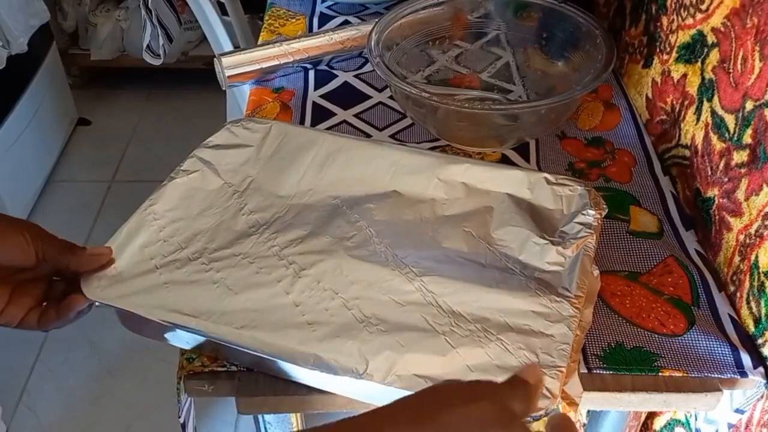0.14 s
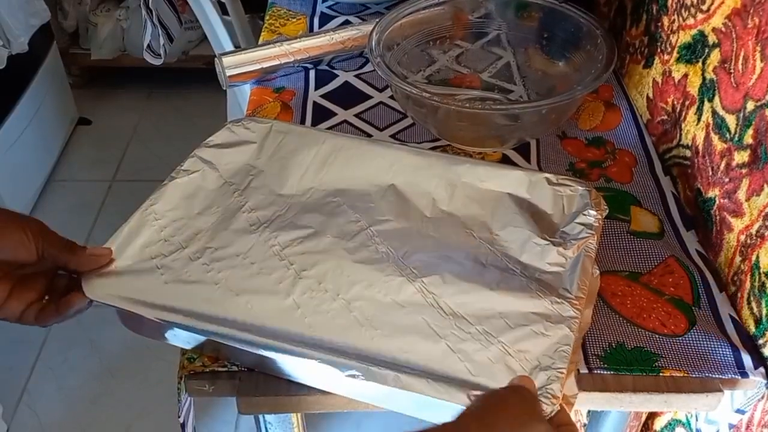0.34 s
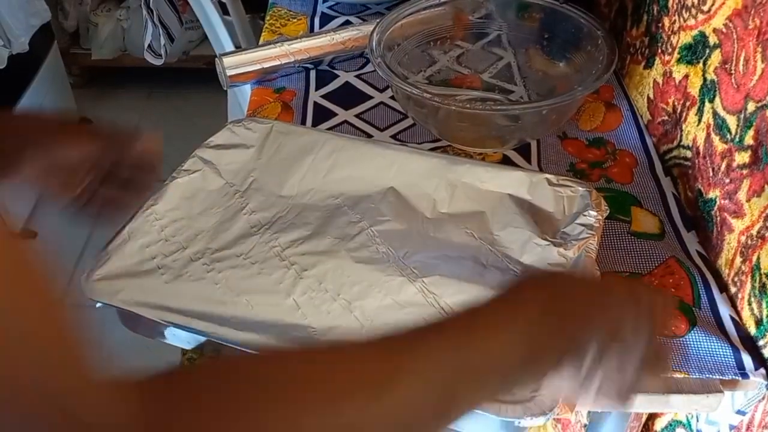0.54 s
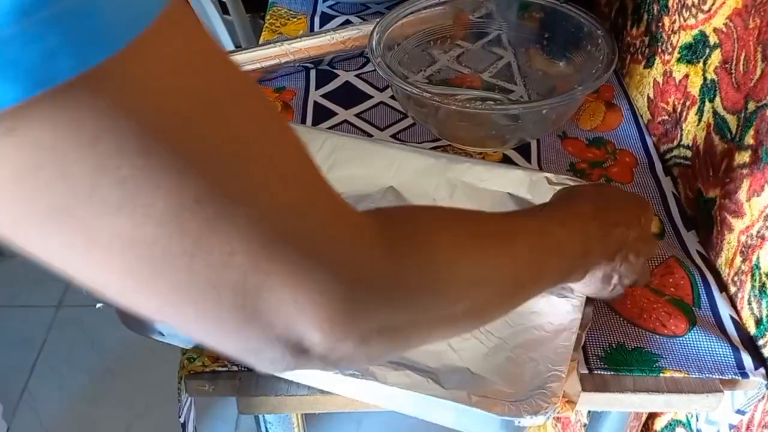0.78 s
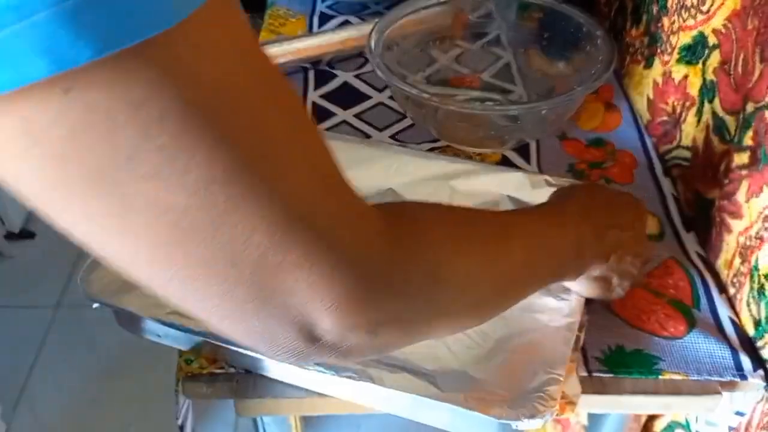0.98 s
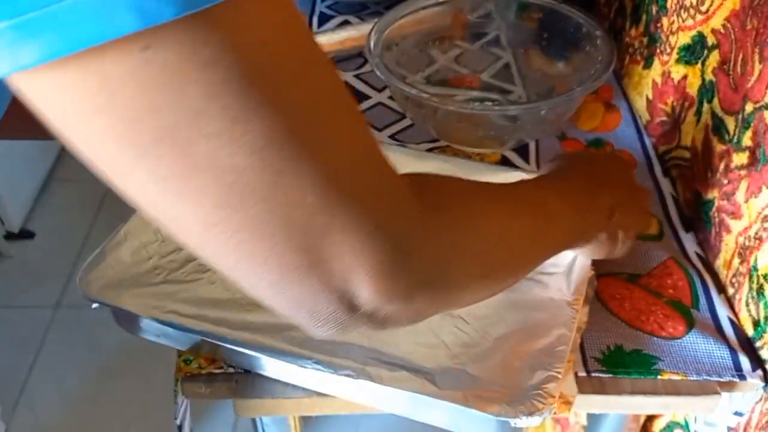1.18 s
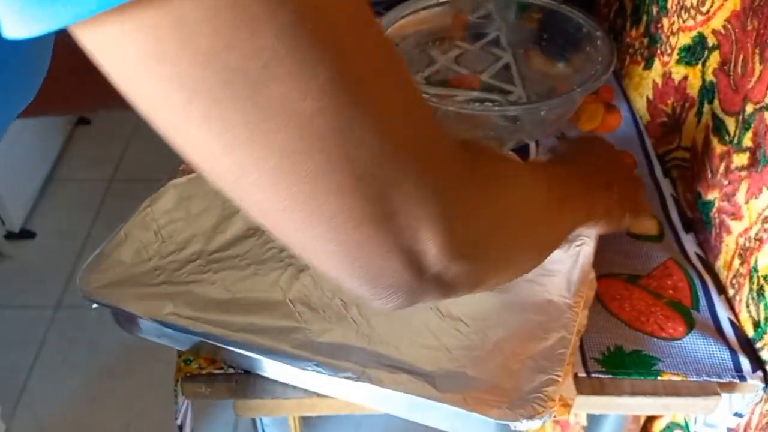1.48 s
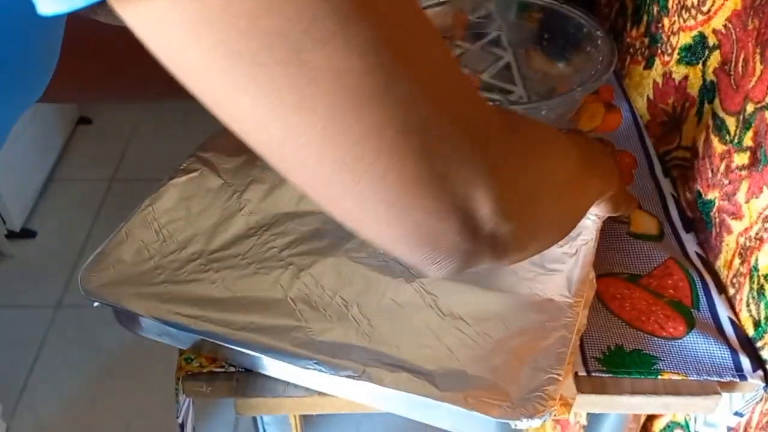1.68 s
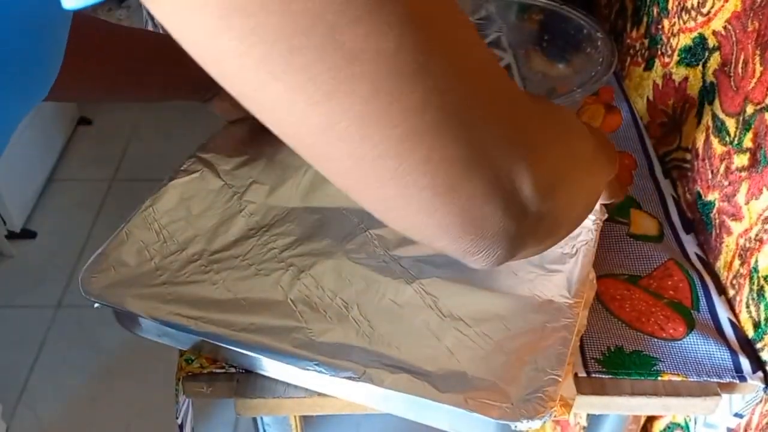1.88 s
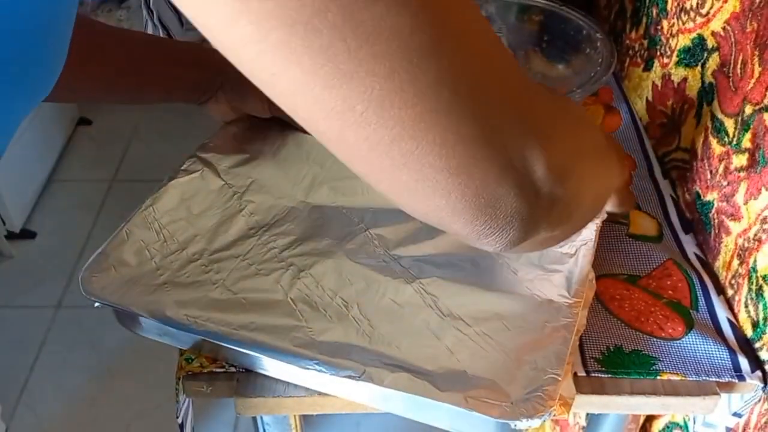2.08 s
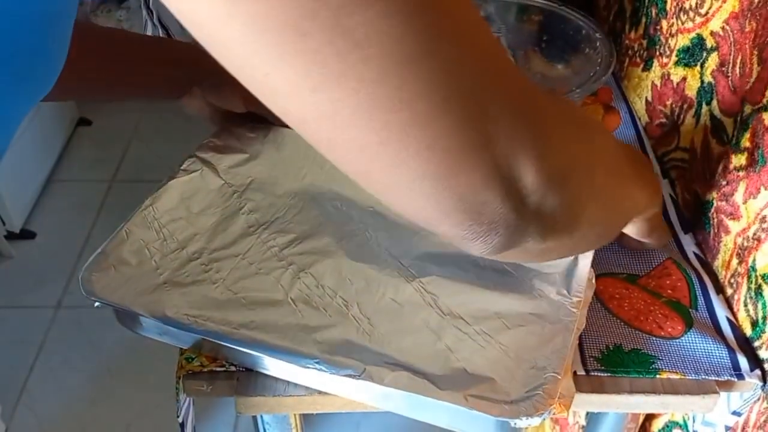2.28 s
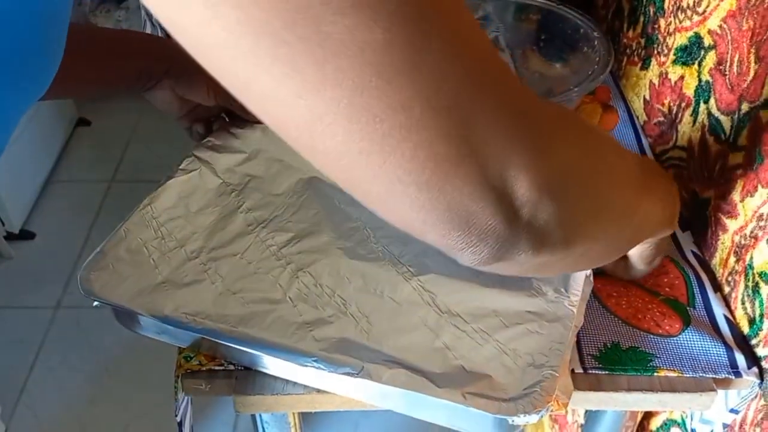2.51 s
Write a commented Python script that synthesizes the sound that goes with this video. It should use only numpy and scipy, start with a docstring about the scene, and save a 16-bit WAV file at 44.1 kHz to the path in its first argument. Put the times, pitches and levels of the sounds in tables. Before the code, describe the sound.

Aluminium foil crackles close by, brightest on the right: a soft boom and a strong tug knocking the tray, a brief lull, then uneven crimping with sharp creases and small pops in a quiet small kitchen.

```python
"""Hands pull a sheet of aluminium foil over a baking tray and crimp it round the rim, in a small kitchen.
The pull opens with a soft falling boom; then two tugs knock the tray and the crackle swells close on the right.
The hands crimp a corner, then an edge, where wide panels of foil pop. Louder cracks of single creases run through it all.
The foil buckles in thousands of tiny random snaps a second: shaped noise makes each one ring in facets, sheet and tray.
Booms, knocks and pops are dying sines; a quiet room noise lies beneath."""
import sys
import numpy as np
from scipy import signal
from scipy.fft import rfft, irfft
from scipy.io import wavfile
from scipy.ndimage import uniform_filter1d

SR = 44100
rng = np.random.default_rng(int(sys.argv[2]) if len(sys.argv) > 2 else 0)


def master_out(mix):
    """Clip the mix to full scale and print it as 16-bit PCM to the path in sys.argv[1]."""
    frames = np.transpose(np.atleast_2d(mix))
    ceiling = np.clip(frames, -1, 1)
    pcm = np.round(ceiling * 32767).astype(np.int16)
    wavfile.write(sys.argv[1], SR, pcm)


N = 116865
TIME = np.arange(N) / SR  # seconds


def from_db(db):
    """Turn decibels into a gain."""
    return 10 ** (np.asarray(db) / 20)


def rms_one(x):
    """Scale to unit power."""
    return x / np.sqrt(np.mean(x ** 2) + 1e-20)


def stereo_noise(alike, size=N):
    """Left and right noise of unit power; alike is their likeness, 1 for identical and 0 for unrelated."""
    mid, side = rng.standard_normal((2, size))
    alike = np.clip(alike, -1, 1)
    return np.sqrt((1 + alike) / 2) * mid + np.sqrt((1 - alike) / 2) * side * [[1], [-1]]


def wander(spread_db, span_s):
    """A gain of unit power that strays at random over about the given time."""
    window = np.hanning(int(2 * span_s * SR) + 3)
    slow = signal.fftconvolve(rng.standard_normal(N), window, "same")
    return rms_one(from_db(spread_db * rms_one(slow)))


def coloured(x, spectrum):
    """Filter with the given spectrum and unit power gain, answering as early as it can (minimum phase)."""
    hz, db = np.transpose(spectrum)
    # Fall to -60 dB just outside the table
    hz = np.r_[hz[0] / 1.3, hz, hz[-1] * 1.3]
    db = np.r_[-60, db, -60]
    size = 8192
    grid = np.maximum(np.arange(size // 2 + 1) * SR / size, 1)
    gain = rms_one(from_db(np.interp(np.log(grid), np.log(hz), db)))
    # Folding the cepstrum (the spectrum of the log gain) makes the filter minimum phase
    cepstrum = irfft(np.log(gain))
    cepstrum[1:size // 2] *= 2
    cepstrum[size // 2 + 1:] = 0
    response = irfft(np.exp(rfft(cepstrum)))
    return signal.fftconvolve(x, response[None], axes=1)[:, :N]


ROOM_T60_S, ROOM_DELAY_S = .175, .003  # time to fade by 60 dB, wait before the tail


def kitchen(x, room_db, alike):
    """The room answers with a short tail of fading noise, room_db against the direct sound; power is kept."""
    t = TIME[:SR // 4]
    fade = from_db(-60 * t / ROOM_T60_S) * (t > ROOM_DELAY_S)
    tail = stereo_noise(alike, size=len(t)) * fade
    wet = from_db(room_db)
    tail = wet * rms_one(tail) / np.sqrt(len(t))
    return (x + signal.fftconvolve(x, tail, axes=1)[:, :N]) / np.sqrt(1 + wet ** 2)


def struck_mode(s, hz, rise_s, decay_s):
    """A sine that swells quickly from time s and dies away; rise and decay are time constants."""
    age = np.maximum(TIME - s, 0)
    return (1 - np.exp(-age / rise_s)) * np.exp(-age / decay_s) * np.sin(2 * np.pi * hz * age)


SNAPS_PER_S, RATE_FOLLOWS = 3500, .3  # rate at the median effort, share of the effort's dB that moves it
SIZE_SPREAD_DB = 2.5  # mean of the random rise in size, before evening
EVEN_S = .010   # the hand's travel sets how much foil buckles within this time
CLUMP_DB, CLUMP_S = 1.2, .003   # snaps come in short clumps


def buckling(effort_db):
    """The foil buckles in random snaps, many small and few large, denser under more effort, then clumped."""
    rate = SNAPS_PER_S * from_db(RATE_FOLLOWS * (effort_db - np.median(effort_db)))
    sizes = from_db(SIZE_SPREAD_DB * np.minimum(rng.exponential(1, N), 4))
    snaps = (rng.random(N) < rate / SR) * sizes * rng.choice([-1, 1], N)
    width = int(EVEN_S * SR) + 1
    power = uniform_filter1d(uniform_filter1d(snaps ** 2, width), width)
    even = snaps / np.sqrt(np.abs(power) + 1e-6)
    return even * wander(CLUMP_DB, CLUMP_S)


FACET_SPREAD_DB = 5   # how unevenly one snap excites the parts of a register, plus or minus
COLOUR_DB, COLOUR_S = 1.3, .012   # each clump favours facets of another size


def foil(snaps, spectrum, level_db, pan_db, ring_s, room_db, alike, count=1):
    """Each snap rings fresh facets: a burst of noise, uneven over `count` bands, that fades 60 dB in ring_s.
    pan_db is left minus right; level_db trims the levels already in the snaps."""
    keep = from_db(-60 / (ring_s * SR)) ** 2  # power left after one sample
    rings = 0
    for k, hz in enumerate(np.linspace(spectrum[0][0], spectrum[-1][0], count, endpoint=False)):
        uneven = rms_one(from_db(FACET_SPREAD_DB * rng.uniform(-1, 1, N)))
        struck = snaps * uneven * wander(COLOUR_DB, COLOUR_S)
        power = signal.lfilter([1 - keep], [1, -keep], struck ** 2 + 1e-18)
        ring = np.sqrt(power) * stereo_noise(alike)
        if k:
            # Keep the earlier bands below hz and the new one above it
            below = signal.butter(3, hz, "low", fs=SR, output="sos")
            above = signal.butter(3, hz, "high", fs=SR, output="sos")
            ring = signal.sosfilt(below, rings) + signal.sosfilt(above, ring)
        rings = ring
    sides = rms_one(from_db([[pan_db], [0]])) * np.sqrt(2 / (1 + abs(alike)))
    return from_db(level_db) * sides * kitchen(coloured(rings, spectrum), room_db, alike)


# Colour of the quiet room. Each row: pitch in Hz, relative strength in dB per Hz.
ROOM_COLOUR = [(30, -3), (90, 1), (300, -6), (1000, -11), (4000, -13), (16000, -13)]


def room_floor():
    """The quiet of the room: steady noise, unrelated left and right."""
    return from_db(-82.5) * coloured(rng.standard_normal((2, N)), ROOM_COLOUR)


# Hands and foil rub against the tray. Each row: time in seconds, low rubbing level in dB before the tray's trim.
RUBBING = [(0.223, -77), (0.232, -60), (0.28, -58), (0.41, -78), (0.465, -61), (0.63, -91), (0.773, -73),
           (1.372, -79), (1.392, -68), (1.569, -79), (1.87, -68), (2.11, -66), (2.384, -73), (2.48, -81),
           (2.62, -68)]


def rubbing():
    """How hard hands and foil rub the tray, in dB, drawn straight from point to point."""
    return np.interp(TIME, *np.transpose(RUBBING))


# Colour of the hands' bumps. Each row: pitch in Hz, relative strength in dB per Hz.
BUMP_COLOUR = [(25, -25), (82, 1), (125, -3), (300, -25)]
BUMP_FOLLOWS = .7   # share of the rubbing's swing in the bumps


def bumps(snaps, rub_db):
    """Soft, low bumps of the hands swell and fade with the rubbing."""
    swing_db = BUMP_FOLLOWS * (rub_db - rub_db.mean())
    return foil(snaps * from_db(swing_db), BUMP_COLOUR,
                level_db=-80.5, pan_db=-3, ring_s=.04, room_db=-12, alike=.4)


# Colour of the shaken tray. Each row: pitch in Hz, relative strength in dB per Hz.
TRAY_COLOUR = [(100, -22), (160, -6), (240, -3), (310, 1), (450, 1), (560, -3), (800, -20)]
TRAY_ALIKE = .7


def tray(snaps, rub_db):
    """The snaps shake the tray beneath, as strongly as the foil rubs on it."""
    return foil(snaps * from_db(rub_db), TRAY_COLOUR,
                level_db=1, pan_db=-2.3, ring_s=.016, room_db=-9, alike=TRAY_ALIKE)


FLEX_S, FLEX_DB = .028, -56  # start, level of the sine's peak before it decays
FLEX_START_HZ, FLEX_END_HZ = 220, 78
FLEX_SAG_S, FLEX_DECAY_S = .016, .021  # time constants of pitch and loudness


def flex():
    """The taut sheet flexes once: a soft boom whose pitch sags as the sheet slackens."""
    age = np.maximum(TIME - FLEX_S, 0)
    hz = FLEX_END_HZ + (FLEX_START_HZ - FLEX_END_HZ) * np.exp(-age / FLEX_SAG_S)
    phase = 2 * np.pi * np.cumsum(hz * (age > 0)) / SR
    return from_db(FLEX_DB) * np.exp(-age / FLEX_DECAY_S) * np.sin(phase)


# The foil is tugged tight and knocks the tray. Each row: start in seconds, level in dB before rise, decay and room.
TUG_TIMES = [(0.227, -48), (0.252, -41)]
# Low notes of the knocked tray. Each row: pitch in Hz, level in dB added to the tug's.
TRAY_NOTES = [(110, -8), (350, -2), (410, -3), (619, 0)]


def tugs():
    """Each tug sets the low modes of the tray ringing."""
    dry = 0
    for s, db in TUG_TIMES:
        for hz, mode_db in TRAY_NOTES:
            dry = dry + from_db(db + mode_db) * struck_mode(s, hz, rise_s=.002, decay_s=.014)
    return kitchen(dry[None], room_db=-9, alike=TRAY_ALIKE)


# Panels pop as the far edge is pressed down. Each row: start in seconds, level in dB before the trim, pitch in Hz.
PANEL_POPS = [(1.769, -43, 1010), (1.826, -38, 950), (1.847, -34, 813), (1.878, -38, 780),
              (1.931, -36, 1070), (2.005, -42, 1000), (2.095, -38, 980), (2.152, -39, 982),
              (2.169, -41, 1200)]
POP_TRIM_DB = 2


def pops():
    """Each wide panel flips through and rings for a few cycles at its own pitch."""
    dry = 0
    for s, db, hz in PANEL_POPS:
        dry = dry + from_db(POP_TRIM_DB + db) * struck_mode(s, hz, rise_s=.001, decay_s=.0035)
    return kitchen(dry[None], room_db=-11, alike=.8)


# Three handlings: the pull, crimping a corner, crimping an edge. Each row: time in seconds,
# level of the fine crackle in dB, level of the sheet's rustle in dB, both before the trim of their register.
PULLING = [(0.0, -34, -54), (0.033, -52, -64), (0.064, -40, -58), (0.135, -39, -57), (0.16, -48, -62),
           (0.227, -40, -56), (0.234, -29, -45), (0.254, -30, -46), (0.259, -23, -40), (0.279, -22.5, -44),
           (0.3, -28, -45), (0.344, -30, -53), (0.376, -49, -60), (0.42, -29, -50), (0.466, -30, -49),
           (0.53, -60, -64), (0.552, -54, -72), (0.586, -85, -84), (0.669, -92, -97)]
CORNER_CRIMPING = [(0.679, -51, -75), (0.695, -46, -70), (0.713, -60, -68), (0.728, -50, -61),
                   (0.774, -53, -61), (0.78, -37, -51), (0.795, -39, -53), (0.822, -52, -57),
                   (0.828, -38, -52), (0.935, -39, -53), (0.949, -33, -51), (1.022, -40, -55),
                   (1.077, -33, -48), (1.142, -52, -64), (1.18, -36, -49), (1.22, -44, -57),
                   (1.244, -43, -57), (1.248, -36, -54), (1.275, -39, -54), (1.31, -47, -61),
                   (1.355, -53, -67), (1.395, -35, -54), (1.46, -45, -57), (1.555, -50, -67),
                   (1.66, -34, -54), (1.68, -38, -55), (1.699, -55, -58)]
EDGE_CRIMPING = [(1.728, -50, -58), (1.731, -39, -52), (1.76, -35, -49), (1.807, -42, -53),
                 (1.864, -34, -49), (1.881, -29, -48), (1.924, -41, -51), (1.938, -30, -46),
                 (2.014, -34, -51), (2.052, -41, -53), (2.165, -37, -48), (2.205, -43, -57),
                 (2.212, -32, -50), (2.258, -36, -51), (2.29, -43, -56), (2.314, -25, -48),
                 (2.345, -31, -48), (2.42, -41, -50), (2.475, -61, -68), (2.519, -39, -56),
                 (2.539, -46, -61), (2.607, -37, -51), (2.649, -58, -63)]


def handling():
    """How strongly the hands work the foil: crackle and rustle levels in dB, straight from point to point."""
    s, fine, wide = np.vstack([PULLING, CORNER_CRIMPING, EDGE_CRIMPING]).T
    return np.interp(TIME, s, fine), np.interp(TIME, s, wide)


# Single creases give way. Each row: start in seconds, level of the bright crack in dB,
# level of its crunch in dB, both before the crease trim and the trim of their register.
CREASE_TIMES = [(0.1266, -25, -33), (0.2329, -22, -29), (0.2573, -14, -25), (0.7786, -28, -34),
                (0.827, -26, -35), (0.9075, -30, -25), (1.1768, -30, -31), (1.2466, -21, -33),
                (1.2805, -22, -32), (1.3339, -27, -44), (1.7285, -25, -31), (1.7348, -28, -25),
                (1.8198, -25, -36), (1.8747, -21, -26), (2.2119, -19, -27), (2.4857, -31, -44),
                (2.5202, -21, -29)]
CREASE_TRIM_DB, CREASE_SNAPS_PER_S, CREASE_DECAY_S = 6.5, 3000, .0035  # decay is a time constant


def creases():
    """Each crease cracks once and sets off a quickly dying run of smaller snaps; returns cracks and crunches."""
    out = np.zeros((2, N))
    run = (rng.random(N) < CREASE_SNAPS_PER_S / SR) * rng.uniform(-1, 1, N)
    for s, *levels_db in CREASE_TIMES:
        start = int(s * SR)
        burst = run[start:] * np.exp(-TIME[:N - start] / CREASE_DECAY_S)
        burst[0] = 1
        out[:, start:] += from_db(levels_db)[:, None] * burst
    return from_db(CREASE_TRIM_DB) * out


# Colour of the wide sheet. Each row: pitch in Hz, relative strength in dB per Hz.
SHEET_COLOUR = [(350, -34), (550, -17), (660, -7), (1050, 0), (1250, -1.5), (1450, -4.5), (2010, 0),
                (2350, -3.5), (3200, -16)]
CREASE_SHEET_DB = -15   # how much of the creases' crunch reaches the wide sheet


def sheet(snaps, sheet_db, crunches):
    """Snaps and creases shake the wide sheet into a middle-pitched rustle."""
    struck = snaps * from_db(sheet_db) + from_db(CREASE_SHEET_DB) * crunches
    return foil(struck, SHEET_COLOUR,
                level_db=-.8, pan_db=-1.5, ring_s=.016, room_db=-7, alike=.45, count=2)


# Colour of the crunch. Each row: pitch in Hz, relative strength in dB per Hz.
CRUNCH_COLOUR = [(1600, -24), (2600, -9), (3300, -5.5), (4100, 0), (4600, -2), (5200, -7), (6200, -7),
                 (7200, -2.5), (8000, -6.5), (9000, -7.5), (12000, -22)]
# Crunch level against the rule below. Each row: time in seconds, lift in dB.
CRUNCH_LIFTS = [(0.27, -1.5), (1.3, -1), (1.56, 2.5), (1.75, .5)]
CRUNCH_FOLLOWS = .55   # share of the fine crackle's dB level; the rest follows the sheet
CRUNCH_GROWTH, CRUNCH_PIVOT_DB = .93, -46   # narrows the swing of that mix about the pivot level


def crunch(snaps, fine_db, sheet_db, crunches):
    """Snaps and creases also ring in a crunch between rustle and crackle, at a level between the two."""
    mix_db = CRUNCH_FOLLOWS * fine_db + (1 - CRUNCH_FOLLOWS) * sheet_db
    rule_db = CRUNCH_PIVOT_DB + CRUNCH_GROWTH * (mix_db - CRUNCH_PIVOT_DB)
    lift_db = np.interp(TIME, *np.transpose(CRUNCH_LIFTS))
    return foil(snaps * from_db(rule_db + lift_db) + crunches, CRUNCH_COLOUR,
                level_db=.8, pan_db=-6.1, ring_s=.014, room_db=-6, alike=.02, count=3)


# Colour of the bright crackle. Each row: pitch in Hz, relative strength in dB per Hz.
CRACKLE_COLOUR = [(5000, -29), (8500, -13), (10000, -6.5), (11300, -1), (12600, 0), (14000, -1.3),
                  (15400, -2.5), (16300, -22)]


def crackle(snaps, fine_db, cracks):
    """Small facets ring very briefly and very high, close on the right."""
    return foil(snaps * from_db(fine_db) + cracks, CRACKLE_COLOUR,
                level_db=.3, pan_db=-13.6, ring_s=.004, room_db=-7, alike=.02, count=4)


def scene():
    """One stream of snaps sounds in every register of foil and tray, over the quiet of the room."""
    fine_db, sheet_db = handling()
    rub_db = rubbing()
    snaps = buckling(fine_db)
    cracks, crunches = creases()
    background = room_floor() + bumps(snaps, rub_db) + tray(snaps, rub_db)
    single_events = flex() + tugs() + pops()
    rustle = sheet(snaps, sheet_db, crunches)
    crunching = crunch(snaps, fine_db, sheet_db, crunches)
    return background + single_events + rustle + crunching + crackle(snaps, fine_db, cracks)


CUTOFF_HZ = 15750


def record(dry):
    """The top is cut steeply by a low-pass filter."""
    return signal.sosfilt(signal.ellip(12, .1, 80, CUTOFF_HZ, fs=SR, output="sos"), dry)


dry = scene()
out = record(dry)
master_out(out)
```